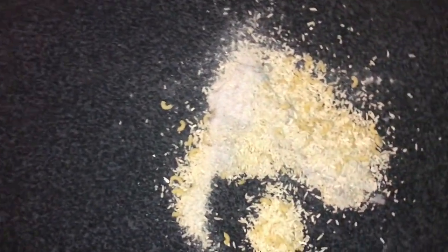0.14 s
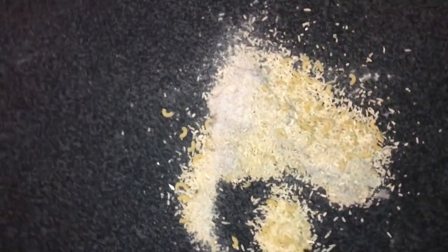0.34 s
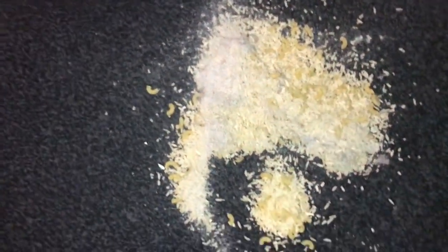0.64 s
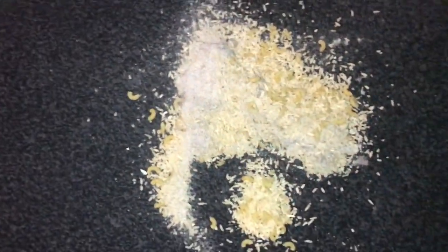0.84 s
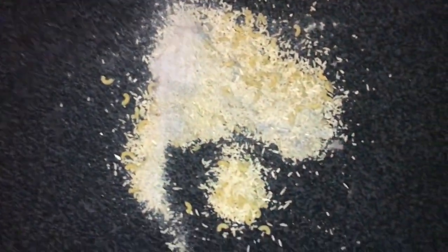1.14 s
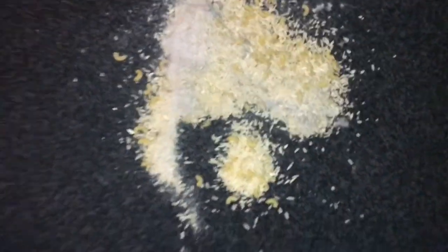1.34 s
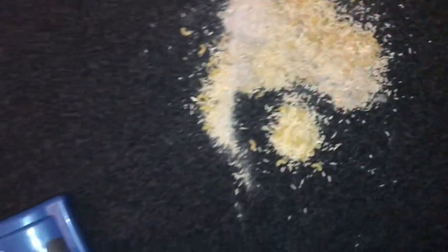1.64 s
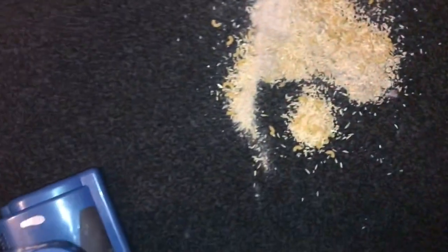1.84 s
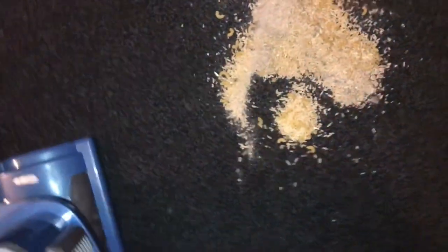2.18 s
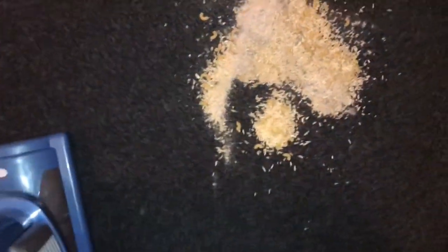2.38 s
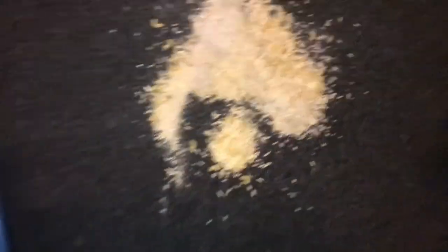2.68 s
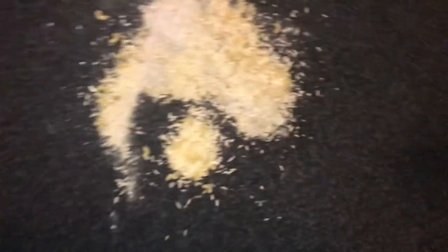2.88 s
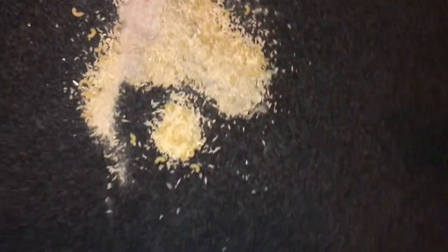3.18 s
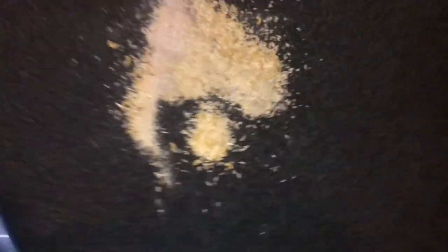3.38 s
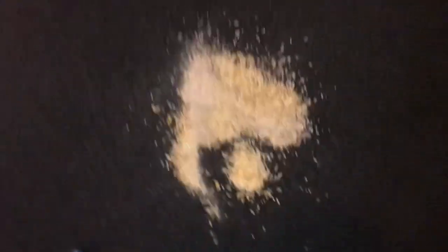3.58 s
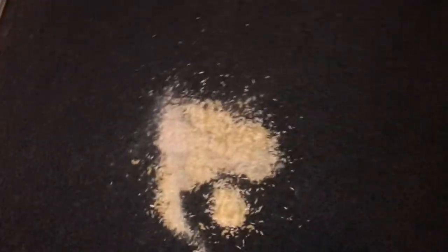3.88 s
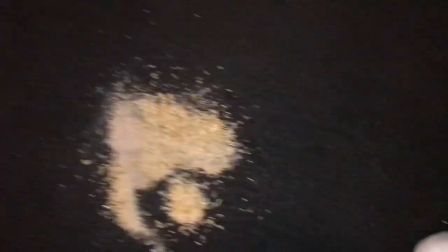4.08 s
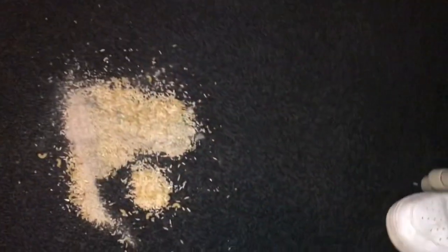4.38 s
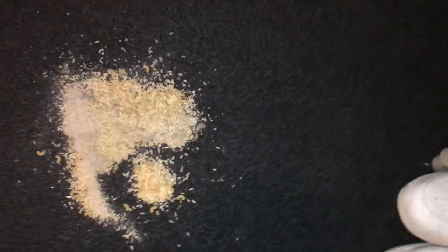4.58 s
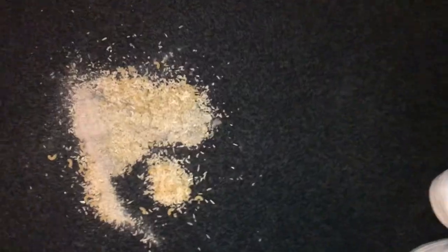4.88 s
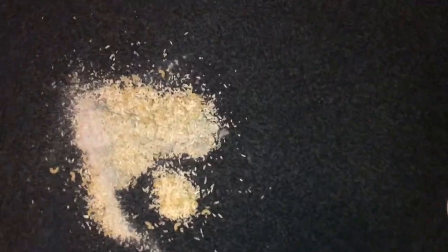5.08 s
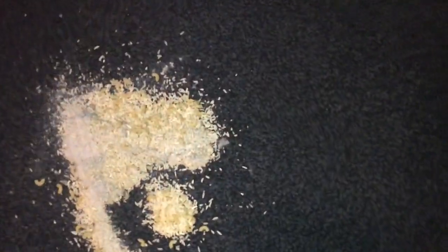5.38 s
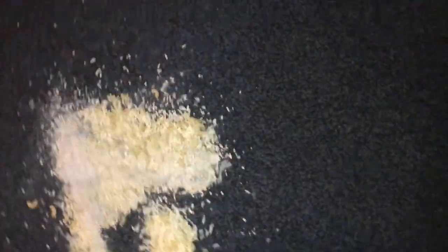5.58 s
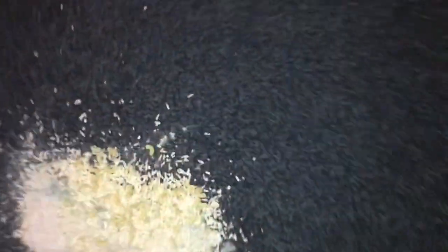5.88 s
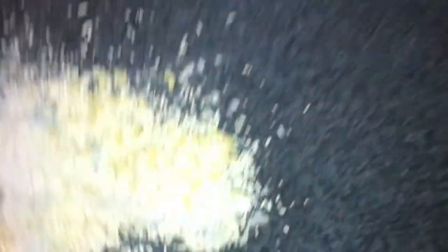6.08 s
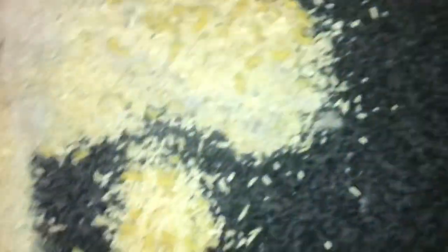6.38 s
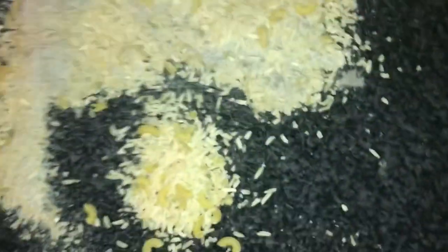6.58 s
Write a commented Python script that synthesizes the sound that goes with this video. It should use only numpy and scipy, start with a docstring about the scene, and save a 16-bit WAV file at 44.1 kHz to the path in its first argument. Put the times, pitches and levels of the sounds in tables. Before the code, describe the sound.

A small quiet room with low mains hum and faint air, heard through one close hand-held microphone. At 0.2-0.3 s plastic parts rub and clack, with another knock at 0.5 s. Around 0.85 s a catch snaps in rapid, very loud cracks, with a bright springy ring and a rebound at 0.92 s. From 1 to 3.6 s there are only small ticks and soft, fluttering slides over a rug. At 3.75 s a body thumps down with a cushioned low boom, followed by scrapes and sharp plastic knocks until 4.1 s. A switch clicks at 4.38 s; the vacuum motor buzzes and sweeps upward for about a second, its whine sinking beneath roaring air. From 5.5 s nozzle hiss strengthens, with a brief gust near 5.8 s. The microphone nears the rug around 6 s, the hollow colour sweeping upward; at 6.26 s the nozzle seals, its whistly resonances coming forward until the end, still running.

```python
"""A small room hums. Plastic parts rub and knock as a vacuum cleaner is readied beside dry grains on a rug.
A catch snaps, something slides over the rug and the body thumps down: cracks of noise and ringing tones.
The switch clicks and the motor runs up: tones follow its speed, and shaped noise makes the rush of air.
The nozzle hisses at the pile, the one hand-held microphone is lowered toward the rug, and the nozzle seals.
The microphone's gain drops after loud peaks."""
import sys
import numpy as np
from scipy import signal
from scipy.fft import rfft, irfft, next_fast_len
from scipy.io import wavfile
from scipy.ndimage import minimum_filter1d, map_coordinates

SR = 44100
rng = np.random.default_rng(int(sys.argv[2]) if len(sys.argv) > 2 else 0)


def to_wav(s):
    """Save 16-bit WAV."""
    ch = np.atleast_2d(s).T  # columns
    pcm = np.round(np.clip(ch, -1, 1) * 32767)  # PCM
    wavfile.write(sys.argv[1], SR, pcm.astype(np.int16))


N = 297234

# microphone nearing the rug:
# (time [s], extra path of the floor echo [m], gain of the floor head's sound [dB])
APPROACH = [(5.5, 0.41, 2), (5.86, 0.3, -1.5), (6.0, 0.25, 2), (6.15, 0.19, 6), (6.27, 0.15, 5.5),
            (6.36, 0.1, 4.5), (6.5, 0.126, 7), (6.74, .12, 7)]
MAINS_HZ = 60.8
START_S = 4.3918   # the motor begins to turn


def from_db(db):
    """Turn decibels into a gain."""
    return 10 ** (np.asarray(db) / 20)


def rms_one(x):
    """Scale a sound to unit power."""
    return x / np.sqrt(np.mean(np.abs(x) ** 2) + 1e-20)


def unit_energy(x):
    """Scale a short sound to unit energy."""
    return x / np.sqrt(np.sum(x ** 2) + 1e-20)


def in_time(rows):
    """Draw each column of a timed table as a curve with one value per sample."""
    s, *columns = np.transpose(rows)
    return [np.interp(np.arange(N) / SR, s, column) for column in columns]


def at_hz(points, hz):
    """Read a table between its points, with pitch on a logarithmic scale."""
    known_hz, values = np.transpose(points)
    return np.interp(np.log(np.maximum(hz, 1)), np.log(known_hz), values)


def coloured(x, spectrum):
    """Filter to a given spectrum without sounding ahead of the input (minimum phase)."""
    size = 2 * next_fast_len(len(x) // 2 + 2048)
    gain = from_db(at_hz(spectrum, np.fft.rfftfreq(size, 1 / SR)))
    cepstrum = irfft(np.log(gain))
    # folding the second half onto the first makes the filter minimum-phase
    cepstrum[1:size // 2] *= 2
    cepstrum[size // 2 + 1:] = 0
    response = np.exp(rfft(cepstrum))
    return irfft(rfft(x, size) * response)[:len(x)]


def noise(spectrum):
    """Make steady coloured noise of unit power."""
    return rms_one(coloured(rng.standard_normal(N), spectrum))


def drift(hz):
    """Waver at random, up to about the given rate, with a spread of 1."""
    f = np.fft.rfftfreq(N // 2 * 2, 1 / SR)[:N // 16]
    size = next_fast_len(N, True)
    random_bins = rng.standard_normal(len(f)) + 1j * rng.standard_normal(len(f))
    return rms_one(irfft(random_bins / (1 + (f / hz) ** 2), size)[:N])


def phase_of(hz):
    """Add up the running phase of a steady or moving frequency."""
    return 2 * np.pi * np.cumsum(hz * np.ones(N)) / SR


def blown(hz, width_hz):
    """A resonance fed by turbulence: its strength and phase wander as fast as it is wide."""
    phase = phase_of(hz)
    cosine_part = drift(width_hz * 0.74) * np.cos(phase)
    sine_part = drift(width_hz * 0.88) * np.sin(phase)
    return rms_one(cosine_part + sine_part)


def blown_together(resonances):
    """Mix several blown resonances, given as (Hz, width Hz, dB), at unit power."""
    return rms_one(sum(from_db(db) * blown(hz, width) for hz, width, db in resonances))


def evened(x, envelope):
    """Noise whose energy is spread evenly over all pitches once it is put under the envelope."""
    for _ in range(4):
        flat = irfft(np.exp(1j * np.angle(rfft(x * envelope))), len(x))
        x = np.clip(flat * np.linalg.norm(envelope) / (envelope + 1e-9), -3, 3)
    return x


def burst(t, t60):
    """A gritty contact that dies away by 60 dB in t60 seconds; unit energy."""
    envelope = from_db(-60 * t / t60)
    return unit_energy(evened(rng.standard_normal(len(t)), envelope) * envelope)


def ringing(t, modes, spread_db):
    """Struck parts ring at their own pitches, each with a strength of its own for this blow."""
    out = np.zeros(len(t))
    for k, (hz, db, t60) in enumerate(modes):
        envelope = from_db(db + spread_db * rng.normal() - 60 * t / t60)
        out += (-1) ** k * envelope * np.sin(2 * np.pi * hz * t)
    return out


def add(out, s, sound):
    """Mix a sound in at a time."""
    start = round(s * SR)
    out[start:start + len(sound)] += sound[:N - start]


def swells(rows, attack_s, fade_db_per_s):
    """Gain of sounds that rise, hold until their length is over and fade."""
    t, out = np.arange(N) / SR, np.zeros(N)
    for s, length, db in rows:
        rise = np.clip((t - s) / attack_s, 0, 1)
        out += rise * from_db(db - fade_db_per_s * np.clip(t - s - length, 0, 1))
    return out


def in_room(x, wet_db, diffuse=True):
    """Direct sound plus a diffuse tail that dies at its own pace at each pitch."""
    # room decay: (frequency [Hz], time to fall by 60 dB [s])
    decay = [(150, 0.35), (500, 0.22), (1200, 0.36), (3800, 0.33), (7000, 0.3), (14000, 0.2)]
    t = np.arange(SR * 3 // 4) / SR
    longest = max(t60 for hz, t60 in decay)
    hz, s, frames = signal.stft(burst(t, longest), SR, nperseg=256)
    faster_db = -60 * np.outer(1 / at_hz(decay, hz) - 1 / longest, s)
    tail = signal.istft(frames * from_db(faster_db), SR)[1][:len(t)]
    tail = unit_energy(tail * (1 - np.exp(-t / .002)))
    echoes = signal.fftconvolve(x, tail)[:N]
    if diffuse:   # wavering path lengths keep the tail from ringing on single pitches
        sway_s = .00015 * drift(30)
        echoes = map_coordinates(echoes, [np.arange(N) + sway_s * SR], order=3)
    return x + from_db(wet_db) * echoes


def mains_hum(level_db=-53, waver_db=1, second_db=-12.0):
    """The mains hums at its own pitch and, more softly, at twice that; pitch and level waver."""
    phase = phase_of(MAINS_HZ + 1.2 * drift(2.6))
    tones = np.sin(phase) + from_db(second_db) * np.sin(2 * phase)
    return np.sqrt(2) * from_db(level_db + waver_db * drift(3)) * tones


def room_air(level_db=-57.5):
    """Still room air is faint, steady, coloured noise."""
    # (frequency [Hz], relative level per Hz [dB])
    air_colour = [(25, -24), (50, 4.5), (85, 6.5), (160, -9.5), (240, -4), (350, -3.5), (520, -13),
                  (720, -18), (1100, -16), (1800, -23.5), (5000, -29), (9500, -33), (10400, -39),
                  (11500, -32), (16000, -35)]
    return from_db(level_db) * noise(air_colour)


def rubbing(grit_db=1.0, attack_s=.006, fade_db_per_s=259):
    """Plastic sticks and slips on plastic in tiny uneven steps."""
    # rubs between the knocks: (start [s], length [s], level [dB])
    rubs = [(.2, 0.05, -44.5), (.505, .012, -50), (.73, 0.041, -58.5), (3.745, 0.038, -39),
            (3.9, 0.13, -45), (4.03, 0.013, -43)]
    # (frequency [Hz], relative level per Hz [dB])
    rub_colour = [(120, -18), (300, -1), (900, 6), (3200, -6), (7000, -16), (10000, -20.5), (16000, -25)]
    slips = rms_one(rng.standard_normal(N) * from_db(grit_db * drift(150)))
    return swells(rubs, attack_s, fade_db_per_s) * rms_one(coloured(slips, rub_colour))


def knocks(level_db=26.5, ring_db=-16.0, thud_db=16.0):
    """Each contact is a short crack and a ring of the housing, duller or brighter with the part that hits."""
    # plastic parts, the switch last:
    # (time [s], relative level [dB], relative thud level [dB], tilt [dB per octave])
    contacts = [(0.2087, -39.5, -16, -1.5), (.2319, -40, -9, -2), (0.24, -43, -5, -4),
                (0.2664, -24, -11.5, -2), (0.2755, -29.5, -10, -4.5), (.401, -51.5, -8, -5.5),
                (0.5189, -28.5, -5, -7), (0.656, -55, -6, -6.5), (.7642, -55, 1, -2.5),
                (1.001, -46, -6.5, -7.5), (1.7934, -62.5, 0, -3), (1.9694, -51.5, 7, -6.5),
                (1.9944, -52, 6, -1.5), (2.1859, -61.5, -1, -4), (2.8198, -59.5, -5.5, 0.5),
                (2.9428, -64.5, 14, -8.5), (3.1102, -49.5, 7, -3), (3.165, -51.5, 8, -6.5),
                (3.653, -55, -6, -2.5), (3.6985, -51, -2, 1.5), (3.7445, -35, 10, -3),
                (3.8923, -33, -8, -5), (3.897, -29.5, 7.5, -1.5), (3.9575, -40, 11, -6.5),
                (4.0097, -40, 16, -0.5), (4.042, -35, 2, -3.5), (4.1292, -53.5, -5, -2.5),
                (4.3835, -37, 0.5, -1.5)]
    # ringing plastic housing: (frequency [Hz], relative level [dB], time to fall by 60 dB [s])
    housing = [(310, -3, .1), (560, 0, .07), (780, 0, .045), (1250, -2, .04), (1700, -6, .025),
               (2850, -4, .04), (3400, -4, .05), (5150, -5, .22), (5755, -8, .19), (7050, -4, .1)]
    # plain knock: (frequency [Hz], relative level per Hz [dB])
    knock_colour = [(550, 7.5), (850, 7.5), (1500, 7), (3000, 6), (6500, 3), (8500, 1), (10400, -5.5),
                    (13000, -3.5), (16000, -8.5)]
    # a firm knock is short and sharp; both times grow as the touch gets lighter
    firm_db, firm_rise_s, firm_t60_s = -29.5, 0.00032, .03
    rise_doubles_db, contact_doubles_db = 15, 58.5
    thud_doubles_db = 35   # heavier parts stay in contact longer
    thud_hz, pivot_hz, tilt_range_hz = 250, 3000, (850, 9500)
    out, t = np.zeros(N), np.arange(SR // 5) / SR
    bands_hz, plain_db = np.transpose(knock_colour)
    octaves = np.log2(np.clip(bands_hz, *tilt_range_hz) / pivot_hz)
    for s, db, thud, tilt in contacts:
        lighter_db = firm_db - db
        rise_s = firm_rise_s * 2 ** (lighter_db / rise_doubles_db)
        contact_t60 = firm_t60_s * 2 ** (lighter_db / contact_doubles_db + thud / thud_doubles_db)
        ring = from_db(ring_db) * unit_energy(ringing(t, housing, spread_db=3.5))
        blow = burst(t, contact_t60) + ring
        blow = unit_energy(blow * (1 - np.exp(-t / rise_s)))
        low_end = [(80, thud_db + thud - 18.5), (thud_hz, thud_db + thud)]
        colour = [*low_end, *zip(bands_hz, plain_db + tilt * octaves)]
        add(out, s, from_db(db) * coloured(blow, colour))
    return from_db(level_db) * out


def catch(crack_db=11.0, ring_db=-14.0, crack_t60=0.017, spring_db=-3.5, spring_t60=.3):
    """The catch hits several times in quick succession and its spring sizzles on."""
    # the catch snaps home and rebounds: (time [s], relative level [dB])
    snaps = [(0.843, -36), (0.856, -30), (0.8652, 0.5), (0.8678, -3), (0.8699, 1.5), (0.915, -12)]
    # the catch's blade and the shell behind it:
    # (frequency [Hz], relative level [dB], time to fall by 60 dB [s])
    blade_and_shell = [(175, -19, .09), (232, -2, .09), (290, -19, .26), (500, -24, .18), (1090, -16, .08),
                       (1530, -15, .05), (2110, -18, .04), (2440, -15, .04), (3290, -8, .07),
                       (3490, -9, .1), (3810, -6, .12), (4005, -11, .08), (4250, -10, .09)]
    # crack of a hit: (frequency [Hz], relative level per Hz [dB])
    crack_colour = [(88, -31.5), (150, -20), (235, -6.5), (330, -10.5), (500, -19.5), (759, -25),
                    (1060, -7), (1310, -15.5), (1500, -9), (2400, -10), (2810, -14), (3550, -2.5),
                    (4250, -6.5), (4860, -20), (6260, -16.5), (10400, -25), (14800, -20.5), (16000, -35.5)]
    # the spring's crowded pitches: (frequency [Hz], relative level per Hz [dB])
    spring_colour = [(2000, -32), (3050, -15), (3350, 0), (3750, 1), (4300, -4), (4750, -22), (6500, -35)]
    out, t = np.zeros(N), np.arange(SR // 2) / SR
    for s, db in snaps:
        crack = from_db(crack_db) * unit_energy(coloured(burst(t, crack_t60), crack_colour))
        spring = from_db(spring_db) * unit_energy(coloured(burst(t, spring_t60), spring_colour))
        add(out, s, from_db(db) * (crack + spring))
    hardest_s = max(snaps, key=lambda snap: snap[1])[0]   # the hardest hit sets the shell ringing
    add(out, hardest_s + 0.0027, from_db(ring_db) * ringing(t, blade_and_shell, spread_db=6.5))
    return out


def rug_slides(attack_s=0.087, fade_db_per_s=170):
    """Something slides softly over the rug: coloured noise that swells and flutters."""
    # (start [s], length [s], level [dB])
    slides = [(2.1, 0.34, -71), (2.45, 0.46, -67), (3.08, 0.17, -63), (3.56, 0.17, -61.5)]
    # (frequency [Hz], relative level per Hz [dB])
    slide_colour = [(1500, -0.5), (4500, -5.5), (5800, -1.5), (7500, -7), (9000, -2), (10400, -7.5),
                    (12500, -5.5), (16000, -10)]
    flutter = from_db(1.3 * drift(25))
    return swells(slides, attack_s, fade_db_per_s) * flutter * noise(slide_colour)


def thumps(cushion_s=0.013):
    """The rug softens the blow, so the floor's low tones swell in."""
    # the body sets down on the floor: (time [s], level [dB])
    set_downs = [(3.7476, -11.5), (4.0049, -27.5)]
    # floor under the rug: (frequency [Hz], relative level [dB], time to fall by 60 dB [s])
    boards = [(64, -12, .18), (97, 0, .2), (128, -12, .12), (195, -12, .11), (245, -10, .11),
              (290, -9, .14)]
    out, t = np.zeros(N), np.arange(SR // 2) / SR
    for s, db in set_downs:
        ring = ringing(t, boards, spread_db=3.0)
        add(out, s, from_db(db) * ring * (1 - np.exp(-t / cushion_s)))
    return out


def start_rings(rise_s=.003):
    """Small parts ring briefly as the motor jerks into motion."""
    # (time [s], frequency [Hz], level [dB], time to fall by 60 dB [s])
    small_parts = [(4.386, 1217, -36, .08), (4.413, 2640, -32, .05)]
    out, t = np.zeros(N), np.arange(SR // 4) / SR
    for s, hz, db, t60 in small_parts:
        ring = ringing(t, [(hz, db, t60)], spread_db=0)
        add(out, s, ring * (1 - np.exp(-t / rise_s)))
    return out


def running_s():
    """Time since the motor began to turn."""
    return np.maximum(np.arange(N) / SR - START_S, 0)


def speed_share(kick_share=.3664, kick_s=.0676, settle_s=.2707):
    """Share of full speed: a quick kick while the fan is unloaded, then a slow approach."""
    t = running_s()
    return 1 - kick_share * np.exp(-t / kick_s) - (1 - kick_share) * np.exp(-t / settle_s)


def with_speed(db_per_decade):
    """Gain of a noise that grows by so many decibels for a tenfold fan speed."""
    return from_db(db_per_decade * np.log10(np.maximum(speed_share(), 1e-9)))


def motor(jitter=0.00107, waver_db=3.0, flutter_db=1.0, shaft_follows=0.58):
    """Shaft tone and blade whine follow the speed; the windings buzz at twice the mains rate, most at the start."""
    # eight fan blades: (multiple of the shaft speed, relative level [dB])
    blades = [(8, -6), (16, 0), (24, -6)]
    # whine let out by the shell: (frequency [Hz], gain [dB])
    blade_colour = [(700, -14), (2300, -9), (3100, -6), (3750, 5), (4300, -2), (5600, 3), (7000, -1),
                    (8200, 1), (9800, -1), (10500, -7), (12000, -1), (15000, -3)]
    # how the body passes on the shaft's unbalance: (frequency [Hz], gain [dB])
    shaft_colour = [(100, -24), (220, -13.5), (330, -6), (460, -9), (550, -16), (585, -4), (612, 0)]
    # carbon brushes fizz on the commutator during the run-up: (start [s], length [s], level [dB])
    brushes = [(4.48, 0.61, -42)]
    full_turns_per_s, shaft_db = 612, -34
    # the whine stands out at first and sinks as the air gets moving
    steady_whine_db, early_db, whine_fade_s = -54.5, 10, .42
    # the current, and so the magnetic buzz, is highest at standstill and falls as the speed rises
    steady_buzz_db, inrush_db = -50.5, 11.5
    share, (_, near_db) = speed_share(), in_time(APPROACH)
    speed = full_turns_per_s * share
    turn = phase_of(speed * (1 + jitter * drift(16)))
    shaft_level_db = shaft_db + at_hz(shaft_colour, speed) + shaft_follows * near_db
    shaft = from_db(shaft_level_db + waver_db * drift(15)) * np.sin(turn)
    whine_db = steady_whine_db + early_db * np.exp(-running_s() / whine_fade_s)
    whine = np.zeros(N)
    for order, db in blades:
        tone_db = whine_db + db + at_hz(blade_colour, order * speed) + flutter_db * drift(30)
        whine += from_db(tone_db) * np.sin(order * turn)
    buzz_db = steady_buzz_db + inrush_db * (1 - share ** 2) + waver_db * drift(15)
    buzz = (running_s() > 0) * from_db(buzz_db) * np.sin(phase_of(2 * MAINS_HZ))
    fizz_gain = swells(brushes, attack_s=.36, fade_db_per_s=178)
    fizz = fizz_gain * blown(hz=13900, width_hz=2300)
    return np.sqrt(2) * (shaft + buzz) + in_room(whine, wet_db=-11, diffuse=False) + fizz


def airflow(gust_db=0.7, buffet_follows=0.37):
    """Exhaust air roars through the body's cavities while the floor head rumbles on the rug; all grow with the speed."""
    # exhaust noise: (frequency [Hz], relative level per Hz [dB])
    exhaust_colour = [(260, -36), (450, -11), (589, -5.5), (705, -6.5), (818, -4.5), (1040, 0), (1360, -6),
                      (1510, -5.5), (2190, -13), (3190, -10), (5790, -17), (8540, -25), (10500, -29.5),
                      (13400, -32), (16000, -36)]
    # air cavities of the body: (frequency [Hz], width [Hz], relative level [dB])
    body_cavities = [(863, 91, 1.5), (1084, 125, 2), (1263, 69, -5.5), (1567, 130, -9), (1845, 150, -4.5)]
    # hollow of the floor head: (frequency [Hz], width [Hz], relative level [dB])
    head_hollow = [(230.2, 40, -2.5), (298.5, 45, -0.5), (347.2, 60, -3.5)]
    # air buffeting the microphone: (frequency [Hz], relative level per Hz [dB])
    buffet_colour = [(25, -53), (50, 5), (100, 10), (180, -0.5), (400, 9), (700, -54)]
    # one stronger gust buffets the microphone: (start [s], length [s], relative level [dB])
    gusts = [(5.78, 0.038, -32)]
    # the roar in the cavities swells once: (start [s], length [s], relative level [dB])
    surges = [(5.39, 0.13, -41)]
    exhaust_db, cavity_db, rumble_db, buffet_db, buffet_swing_db = -24.5, -30.5, -35.5, -42, 1.5
    _, near_db = in_time(APPROACH)
    cavity_gain = from_db(cavity_db) + swells(surges, attack_s=0.083, fade_db_per_s=130)
    cavities = cavity_gain * blown_together(body_cavities)
    exhaust = from_db(exhaust_db) * noise(exhaust_colour)
    roar = from_db(gust_db * drift(7.2)) * (exhaust + cavities)
    rumble = from_db(rumble_db + near_db + gust_db * drift(7.2)) * blown_together(head_hollow)
    buffet_gain = from_db(buffet_db + buffet_follows * near_db + buffet_swing_db * drift(15))
    gust_gain = swells(gusts, attack_s=.02, fade_db_per_s=252)
    buffet = (buffet_gain + gust_gain) * noise(buffet_colour)
    return with_speed(35.5) * roar + with_speed(20.5) * (rumble + buffet)


def nozzle(flutter_db=0.37, db_per_decade=50):
    """Air squeezed between nozzle and pile hisses and sounds the slot and throat, which wobble with the gap."""
    # suction as the nozzle meets the pile: (time [s], relative level [dB])
    suction = [(4.4, -7.5), (5.42, -9.5), (5.56, -1), (5.68, 0.5), (6.15, 1.5), (6.4, -1), (6.74, 0)]
    # hiss: (frequency [Hz], relative level per Hz [dB])
    hiss_colour = [(1200, -10), (2200, -1.5), (3300, -11), (3750, -2), (4300, -5), (5050, -7), (5600, 0),
                   (7000, -2.5), (8500, -4.5), (9800, -6.5), (10400, -13), (11500, -10), (15500, -15)]
    # slot resonances: (ratio to the main frequency, width [Hz], relative level [dB])
    slot_resonances = [(.93, 570, -1.5), (1.07, 742, -2.5), (1.2, 1000, -4)]
    hiss_db, slot_db, throat_db = -27.5, -29.5, -39
    slot_hz, throat_hz, throat_width_hz, gap_wobble = 5670, 3220, 580, .025
    # the nozzle seals against the rug and its resonances come forward
    seal_s, seal_rise_s, seal_slot_db, seal_throat_db = 6.26, 0.063, 4, 8
    suction_db, = in_time(suction)
    seal = np.clip((np.arange(N) / SR - seal_s) / seal_rise_s, 0, 1)
    gap = 1 + gap_wobble * drift(8)
    drive_db = 1.7 * suction_db   # slot and throat respond more strongly than the hiss
    slot = blown_together([(ratio * slot_hz * gap, width, db) for ratio, width, db in slot_resonances])
    slot = from_db(slot_db + drive_db + seal_slot_db * seal) * slot
    throat = blown(throat_hz * gap, throat_width_hz)
    throat = from_db(throat_db + drive_db + seal_throat_db * seal) * throat
    hiss = from_db(hiss_db + suction_db) * noise(hiss_colour)
    return with_speed(db_per_decade) * (hiss + slot + throat) * from_db(flutter_db * drift(25))


def floor_echo(x, echo_db=-19.5, lowest_hz=2200):
    """The treble bounces off the floor; as the path shortens, a hollow colour sweeps upward."""
    path_m, near_db = in_time(APPROACH)
    highpass = signal.butter(2, lowest_hz, "high", fs=SR, output="sos")
    treble = signal.sosfiltfilt(highpass, x)
    delay_s = path_m / 343   # speed of sound [m/s]
    echo = map_coordinates(treble, [np.arange(N) - delay_s * SR], order=3)
    return x + from_db(echo_db + near_db) * echo


def gain_control(x, threshold_db=-6, attack_s=.035, hold_s=.16, release_db_per_s=70):
    """Gain that turns down after a loud peak, holds there and comes back up."""
    hold = int(hold_s * SR) // 2 * 2 + 1
    peak_db = 20 * np.log10(np.abs(x).max(axis=0) + 1e-9)
    over_db = np.maximum(peak_db - threshold_db, 0)
    held_db = -minimum_filter1d(-over_db, hold, origin=hold // 2)
    release_db = release_db_per_s * np.arange(N) / SR
    cut_db = np.maximum.accumulate(held_db + release_db) - release_db
    r = np.exp(-1 / (attack_s * SR))
    return from_db(-signal.lfilter([1 - r], [1, -r], cut_db))


def scene():
    """All sources reach one microphone, the same in both channels."""
    background = mains_hum() + room_air() + rug_slides()
    parts = in_room(rubbing() + knocks() + start_rings(), wet_db=-10.0)
    handling = parts + in_room(catch(), wet_db=-3.5) + thumps()
    air = in_room(floor_echo(airflow() + nozzle()), wet_db=-15.0, diffuse=False)
    return np.tile(background + handling + motor() + air, (2, 1))


def record(dry):
    """The gain drops after the loudest peaks, whatever exceeds full scale clips, and the top is cut."""
    clipped = np.clip(dry * gain_control(dry), -1, 1)
    lowpass = signal.ellip(12, .1, 80, 15900, fs=SR, output="sos")   # cutoff [Hz]
    return signal.sosfilt(lowpass, clipped)


dry = scene()
out = record(dry)
to_wav(out)
```